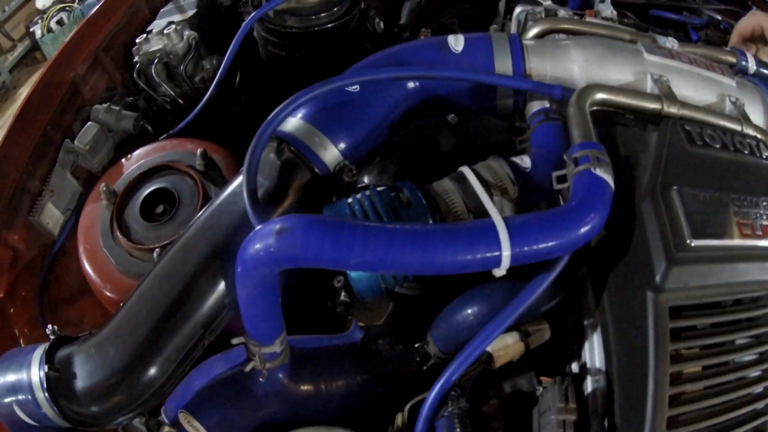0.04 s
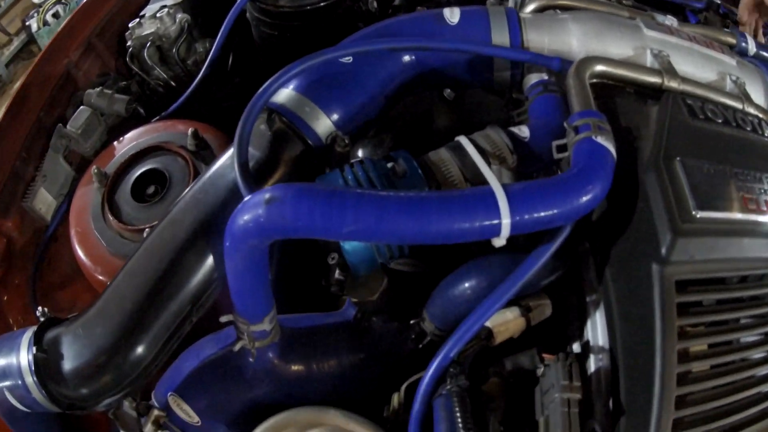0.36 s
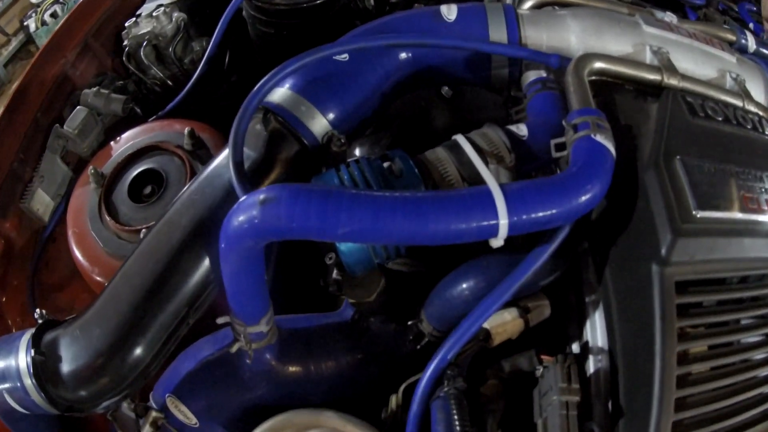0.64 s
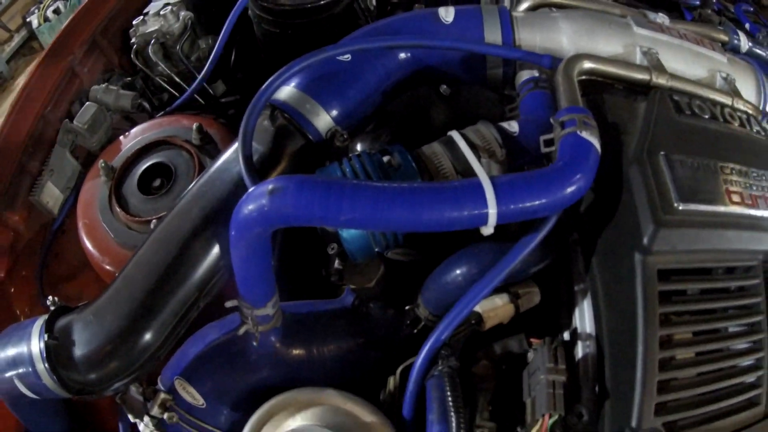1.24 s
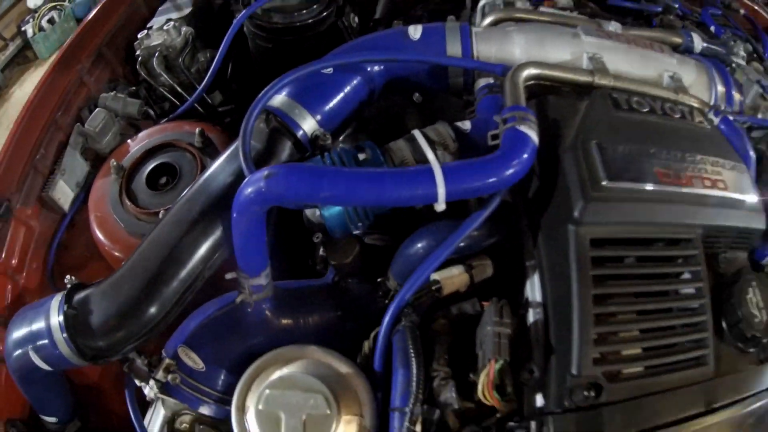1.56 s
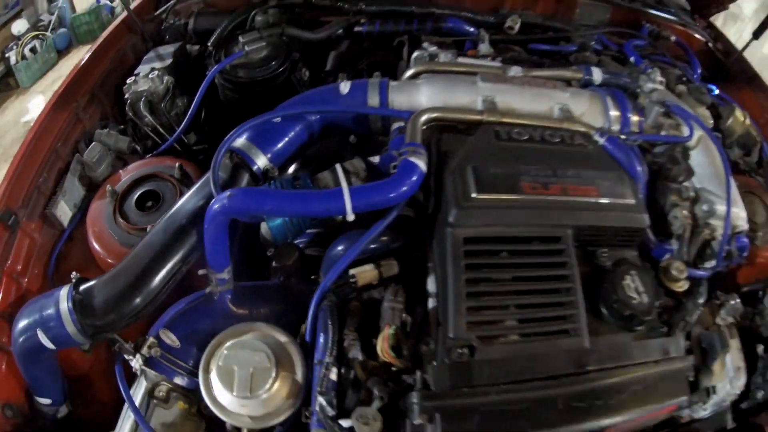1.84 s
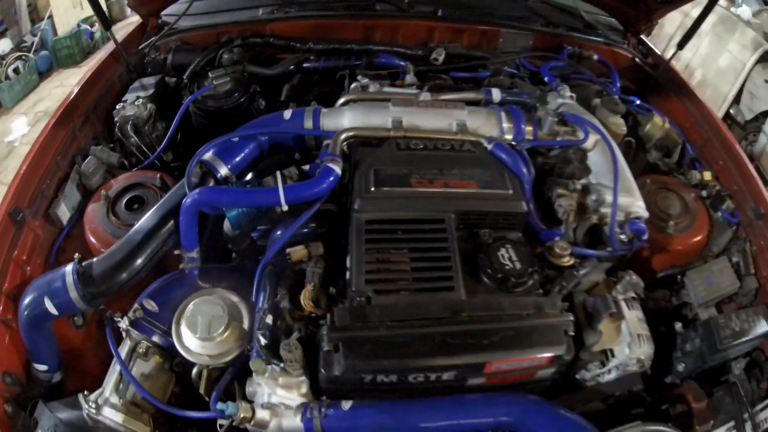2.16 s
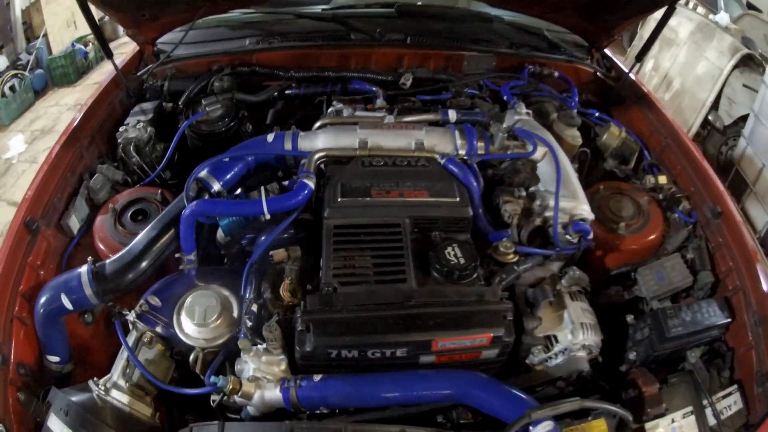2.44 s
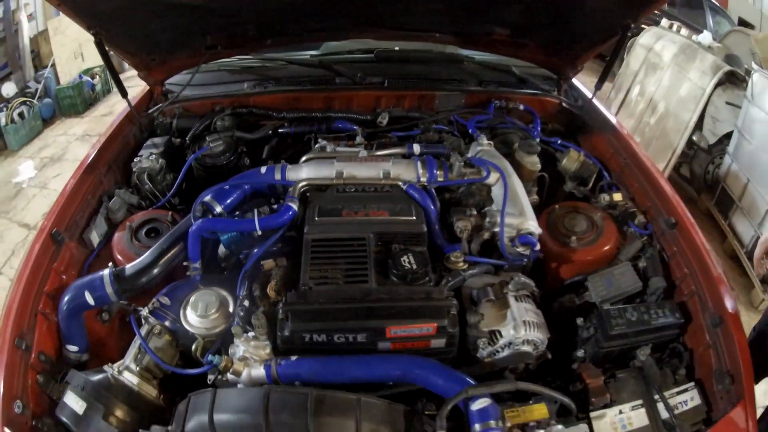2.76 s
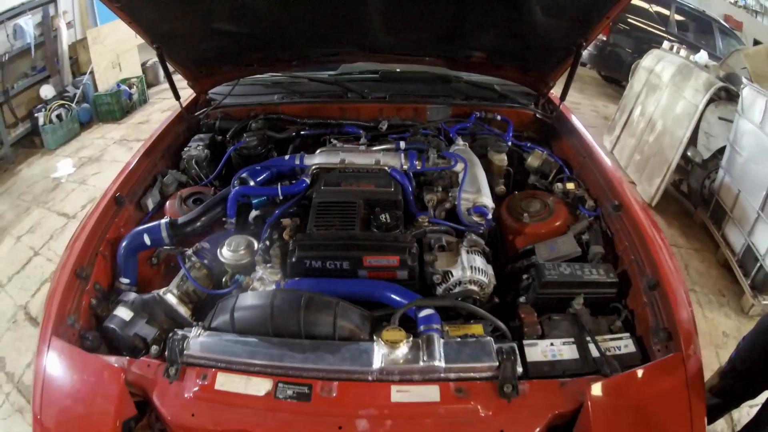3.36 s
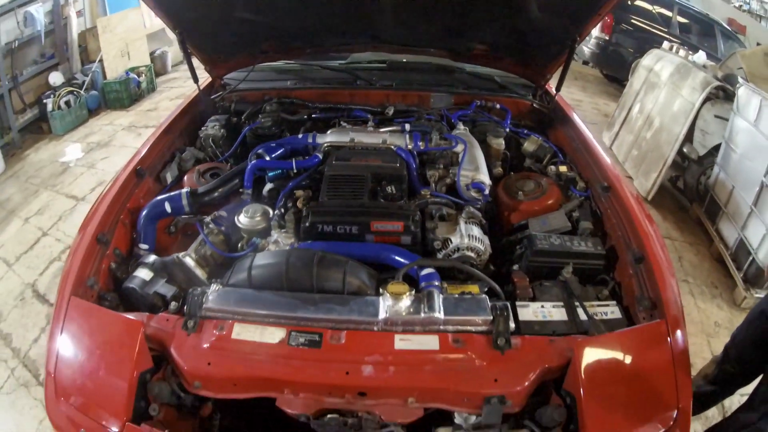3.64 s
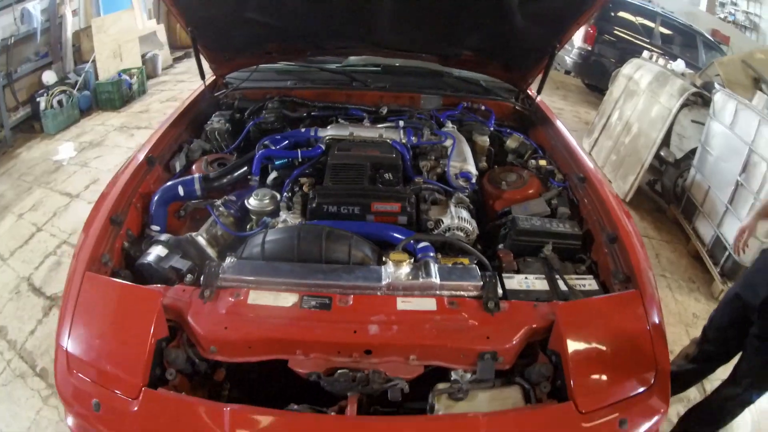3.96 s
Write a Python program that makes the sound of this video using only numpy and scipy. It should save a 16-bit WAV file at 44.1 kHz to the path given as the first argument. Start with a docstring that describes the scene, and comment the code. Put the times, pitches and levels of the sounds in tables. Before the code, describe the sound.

A turbocharged car engine revs once, flutters out hissing air, and sinks to idle.

```python
"""A roar of intake air and a boom of exhaust: a turbocharged straight-six is blipped in a workshop, heard in
mono from over the open engine bay. The throttle shuts, and trapped boost surges back through the compressor in
fading chuffs, about 14 a second. The exhaust booms on as the revs sink, and the engine settles into a rumbling
idle, with belts whirring and injectors ticking."""
import sys
import numpy as np
from scipy import signal
from scipy.fft import rfft, irfft
from scipy.io import wavfile

SR = 44100
rng = np.random.default_rng(int(sys.argv[2]) if len(sys.argv) > 2 else 0)


def waveform_to_disk(signal):
    """Save audio, clipped to [-1, 1], as 16-bit WAV at the path in sys.argv[1]."""
    frames = np.transpose(np.atleast_2d(signal))
    scaled = np.clip(frames, -1, 1) * 32767
    samples = np.round(scaled).astype(np.int16)
    wavfile.write(sys.argv[1], SR, samples)


N = 176400
TIME = np.arange(N) / SR

# The revs. Each row: time in seconds, firings per second.
FIRING_RATE = [(0, 156), (.15, 175.5), (.3, 220), (.4, 249), (.55, 237), (.8, 208), (1, 190), (1.25, 163),
               (1.5, 144.4), (1.75, 123.5), (2, 104.6), (2.25, 87), (2.5, 72), (2.65, 63), (2.8, 53),
               (3, 54), (3.25, 50.3), (3.5, 50.2), (3.75, 49.5), (4, 44.7)]
# Belts, fan and block below the microphone. Each row: time in seconds, level in dB.
BAY_LEVEL = [(0, -28.5), (.4, -39.5), (1.2, -32.5), (1.6, -37.5), (1.73, -45.5), (1.96, -47), (2.3, -40),
             (2.62, -34.5), (2.8, -38.5), (3.05, -31), (3.3, -25.5), (3.55, -27), (4, -26)]
# Narrow rings of the engine. Each row: pitch in Hz, width in Hz, relative level in dB.
BAY_RINGS = [(369.5, 30.5, -11), (1076, 100, -13.5), (1415, 59, -16), (4495, 210, -16.5)]
# Exhaust note at the firing rate. Each row: time in seconds, level in dB.
EXHAUST_BOOM = [(0, -8.5), (.025, -9.5), (.055, -38), (.11, -10.5), (.14, -21.5), (.17, -11), (.21, -22),
                (.26, -16.5), (.36, -38), (.65, -50), (.83, -32.5), (.87, -23), (.905, -47), (.945, -21),
                (.985, -35), (1.02, -24), (1.07, -61), (1.18, -33), (1.225, -10), (1.26, -31), (1.29, -32),
                (1.37, -8), (1.45, -30.5), (1.51, -12), (1.6, -21), (1.66, -12.5), (1.77, -18), (1.81, -30),
                (1.85, -13), (1.93, -17), (2, -40), (2.05, -17.5), (2.22, -19.5), (2.56, -35),
                (2.66, -14.5), (2.73, -23), (2.82, -35), (4, -57)]
# Its overtones. Each row: time in seconds, levels in dB at twice and three times the firing rate.
EXHAUST_OVERTONES = [(0, -43, -49), (.3, -34, -37), (.45, -55, -74), (1.2, -61, -72), (1.36, -31, -55),
                     (1.5, -56, -57), (1.64, -41, -54), (1.71, -52, -34), (1.76, -50, -60),
                     (1.81, -48, -59), (1.86, -49, -34.5), (1.97, -46, -58), (2.25, -36, -54),
                     (2.4, -21, -50), (2.57, -24.5, -44), (2.66, -13.5, -40), (2.87, -28, -30.5),
                     (3, -27.5, -24.5), (3.25, -19, -20), (4, -19.5, -19.5)]
# Uneven firing. Each row: time in seconds, levels in dB of the rumble and of the crankshaft tones
# at 2/3 and 4/3 of the firing rate.
UNEVEN_FIRING = [(0, -25, -36, -32), (.3, -38, -43, -57), (.6, -39, -65, -72), (.95, -42.5, -34.5, -69),
                 (1.25, -30, -30.5, -39), (1.45, -28, -44, -34), (1.8, -37.5, -64, -41),
                 (2.25, -34.5, -42, -24), (2.5, -25.5, -60, -31.5), (2.7, -28, -55, -21),
                 (2.9, -30, -60, -32), (3.3, -21, -62, -35.5), (4, -21, -60, -44)]
# Heavy exhaust pops. Each row: centre in seconds, peak in dB, pitch in Hz.
EXHAUST_POPS = [(.44, -25, 70), (.872, -17.5, 170), (.943, -15.5, 147), (1.018, -17.5, 138),
                (1.16, -17.5, 119), (3.447, -2, 132), (3.82, -9, 135.4)]
# Open-throttle roar. Each row: time in seconds, growl in dB, rasp in dB.
INTAKE_LEVELS = [(0, -25.5, -41), (.03, -38, -38), (.135, -21, -30), (.17, -25, -33), (.22, -21.5, -27),
                 (.3, -20.5, -21.5), (.335, -27, -21), (.39, -44.5, -43), (.6, -64, -61)]
# Compressor surges. Each row: centre in seconds, relative peak in dB.
SURGES = [(0.392, -8.5), (0.468, -11.5), (.545, -11), (.615, -11), (.692, -10.5), (.765, -10.5),
          (.835, -10), (0.906, -10.5), (0.978, -10.5), (1.048, -10), (1.117, -9.5), (1.187, -12),
          (1.257, -13), (1.329, -14), (1.397, -20), (1.47, -20.5), (1.538, -23.5), (1.61, -25),
          (1.676, -31), (1.751, -38), (1.817, -37.5), (1.887, -42.5), (1.957, -41), (2.027, -43.5),
          (2.093, -40.5), (2.163, -42.5), (2.229, -41.5), (2.296, -42.5), (2.364, -42.5), (2.429, -41),
          (2.493, -42), (2.561, -41.5), (2.622, -38.5)]
# Surges shorten as boost drains. Each row: time in seconds, half length in seconds.
SURGE_HALF_LENGTH = [(.39, 0.035), (.55, 0.036), (.77, 0.028), (.91, 0.025), (1.1, 0.022), (1.6, 0.018),
                     (2.6, 0.011)]
# Intake pipe resonances. Each row: pitch in Hz, width in Hz, relative dB at high, low and spent boost.
PIPE_RINGS = [(3390, 200, -15.5, -17, -2.5), (5150, 720, -14, -18, -2), (11370, 380, -27, -8.5, -8.5),
              (12810, 270, -15, -5.5, -15)]
# Thin jet leaking at high boost. Each row: time in seconds, level in dB.
LEAK_LEVEL = [(.33, -62), (.355, -19), (.7, -21), (.82, -23), (.95, -56), (1.2, -70)]
# Tone of each noise at the microphone. Each row: frequency in Hz, relative level in dB.
WHIRR_SPECTRUM = [(150, -10), (250, 3.5), (297, -4.5), (365, -8), (457, -8.5), (542, -6.5), (739, -8.5),
                  (849, -11.5), (1040, -11.5), (1260, -11.5), (1420, -8), (2080, -19), (3860, -20),
                  (4510, -20.5), (4910, -21.5), (12000, -25.5), (15300, -30)]
TICK_SPECTRUM = [(4000, -24), (7000, -6), (12000, 4), (15000, -2.5)]
RUMBLE_SPECTRUM = [(20, -33), (40, -20), (62, -8.5), (100, 4), (150, 3), (200, 1.5), (260, -17.5),
                   (400, -38.5), (900, -80)]
GROWL_SPECTRUM = [(200, 2.5), (300, -3.5), (390, -8.5), (480, 2.5), (570, -3), (680, 1), (900, -7.5),
                  (3000, -57)]
RASP_SPECTRUM = [(700, -18.5), (1300, 3.5), (1620, 1), (2100, -10), (3500, -16.5), (15000, -22)]
HIGH_BOOST_SPECTRUM = [(1060, -33), (1800, -10), (2400, -12.5), (2950, -9), (3190, -1.5), (3400, -4),
                       (3780, -6.5), (4490, -0.5), (5180, 0.5), (6830, -6), (8550, -3.5), (10100, -8.5),
                       (11200, -3), (13000, -8), (15300, -10.5)]
LOW_BOOST_SPECTRUM = [(1180, -48), (2000, -15), (2350, -17), (2980, -10), (3280, -11), (3720, -17),
                      (3920, -7), (5190, -7), (6810, -13), (8500, -5.5), (9340, -9), (11200, -2.5),
                      (12200, -1.5), (12800, -1.5), (15300, -11.5)]
HOLLOW_SPECTRUM = [(900, -16), (1550, 7.5), (2100, -8), (3000, -23), (8000, -50)]
GULP_SPECTRUM = [(120, 7), (650, 0), (1100, -1), (4000, -45)]
LEAK_SPECTRUM = [(5500, -31), (8500, -8), (11200, 3.5), (15000, -2.5)]

CYLINDERS = 6
HIGH_BOOST_S, LOW_BOOST_S, SPENT_S = .52, 1.1, 2.36


def from_db(db):
    """Decibels to gain."""
    return 10 ** (np.asarray(db) / 20)


def rms_one(x):
    """Scale to unit level."""
    return x / np.sqrt(np.mean(x ** 2) + 1e-20)


def in_time(rows):
    """Each column of a curve at every sample."""
    times, *columns = np.transpose(rows)
    return [np.interp(TIME, times, column) for column in columns]


def noise():
    """White noise."""
    return rng.standard_normal(N)


def coloured(x, spectrum):
    """Shape x by a spectrum, rolling off below its first point; unit level."""
    hz, db = np.transpose(spectrum)
    bins = np.maximum(np.fft.rfftfreq(2 * N, 1 / SR), 1)
    gain = from_db(np.interp(np.log(bins), np.log(hz), db)) * np.minimum(bins / hz[0], 1) ** 2
    return rms_one(irfft(rfft(x, 2 * N) * gain)[:N])


def drift(hz):
    """Random wander with spread 1, mostly slower than hz."""
    step, settle = 40, 2000
    pole = np.exp(-2 * np.pi * hz * step / SR)
    kicks = rng.standard_normal(N // step + settle + 2)
    slow = signal.lfilter([1], [1, -2 * pole, pole ** 2], kicks)[settle:]
    return np.interp(np.arange(N) / step, np.arange(len(slow)), rms_one(slow))


def ringing_noise(hz, width):
    """Noise through one resonance; unit level."""
    pole = np.exp(-np.pi * width / SR)
    feedback = [1, -2 * pole * np.cos(2 * np.pi * hz / SR), pole ** 2]
    return rms_one(signal.lfilter([1, 0, -1], feedback, noise()))


def cyclic_noise(firings, tonal, top_hz):
    """Noise of which a part repeats every engine cycle, so that its lines follow the revs."""
    size = 4096
    position = firings / CYLINDERS * size
    loop = np.interp(position, np.arange(size), rng.standard_normal(size), period=size)
    loop = signal.sosfilt(signal.butter(2, top_hz, fs=SR, output="sos"), loop)
    return np.sqrt(tonal * np.gradient(position)) * loop + np.sqrt(1 - tonal) * noise()


def machinery(firings):
    """Block and belts whirr below the microphone, clattering with the valve gear; the injectors tick strong and
    weak by turns."""
    level_db, = in_time(BAY_LEVEL)
    clatter = 1 + .23 * np.cos(2 * np.pi * firings) * drift(22)
    whirr = coloured(clatter * cyclic_noise(firings, tonal=.19, top_hz=2550), WHIRR_SPECTRUM)
    rings = sum(from_db(db) * ringing_noise(hz, width) for hz, width, db in BAY_RINGS)
    strength = np.where(np.floor(firings) % 2, .28, 1) * from_db(1.8 * drift(16))
    decay = np.exp(-3.4 * (firings % 1))
    ticks = rms_one(strength * decay * coloured(noise(), TICK_SPECTRUM))
    return from_db(level_db) * (whirr + rings + from_db(-18) * ticks)


def exhaust(firings):
    """Tones locked to the crankshaft, over the rumble of unequal firing pulses."""
    def tone(multiple, db, waver_db):
        amplitude = np.sqrt(2) * from_db(db + waver_db * drift(8.4))
        return amplitude * np.sin(2 * np.pi * (multiple * firings + rng.random()))
    boom_db, = in_time(EXHAUST_BOOM)
    second_db, third_db = in_time(EXHAUST_OVERTONES)
    rumble_db, below_db, above_db = in_time(UNEVEN_FIRING)
    tones = tone(1, boom_db, waver_db=.7)
    tones += tone(2, second_db, waver_db=1.5) + tone(3, third_db, waver_db=1.5)
    tones += tone(2 / 3, below_db, waver_db=2) + tone(4 / 3, above_db, waver_db=2)
    starts = np.flatnonzero(np.diff(np.floor(firings)))
    pulses = np.zeros(N)
    pulses[starts] = rng.standard_normal(len(starts))
    pulses = rms_one(pulses / np.sqrt(np.gradient(firings)))  # equal power at any revs
    return tones + from_db(rumble_db) * coloured(pulses + 1.05 * noise(), RUMBLE_SPECTRUM)


def pops(half_length_s=.0076):
    """Now and then one firing thumps out of the exhaust pipe."""
    thumps = np.zeros(N)
    for centre, db, hz in EXHAUST_POPS:
        t = TIME - centre
        envelope = np.exp(-np.minimum((t / half_length_s) ** 2, 20))
        thumps += from_db(db) * envelope * np.cos(2 * np.pi * hz * t)
    return thumps


def intake(firings):
    """Air is drawn once a firing, growling and rasping while the throttle is open."""
    growl_db, rasp_db = in_time(INTAKE_LEVELS)
    suction = 1 + .13 * np.cos(2 * np.pi * firings)
    flow = suction * cyclic_noise(firings, tonal=.36, top_hz=3060)
    growl = from_db(growl_db) * coloured(flow, GROWL_SPECTRUM)
    return growl + from_db(rasp_db) * coloured(flow, RASP_SPECTRUM)


def escaping_air(low_cut_hz=2340):
    """Trapped boost hisses out; the intake pipe whistles more clearly as it drains."""
    drained = np.interp(TIME, [HIGH_BOOST_S, LOW_BOOST_S], [0, 1])
    air = np.sqrt(1 - drained) * coloured(noise(), HIGH_BOOST_SPECTRUM)
    air += np.sqrt(drained) * from_db(-2) * coloured(noise(), LOW_BOOST_SPECTRUM)
    for hz, width, *levels_db in PIPE_RINGS:
        ring_db = np.interp(TIME, [HIGH_BOOST_S, LOW_BOOST_S, SPENT_S], levels_db)
        air += from_db(ring_db) * ringing_noise(hz, width)
    return signal.sosfilt(signal.butter(1, low_cut_hz, "high", fs=SR, output="sos"), air)


def turbo_flutter(squareness=2.75, rise_stretch=1.057, gulp_delay_s=.034):
    """Boost surges back through the compressor in hollow puffs, each with a gulp, over a thin leak."""
    power = np.zeros(N)
    for centre, db in SURGES:
        half_s = np.interp(centre, *np.transpose(SURGE_HALF_LENGTH))
        offset = abs(TIME - centre) / (half_s * np.where(TIME < centre, rise_stretch, 1))
        power += from_db(db) ** 2 * np.exp(-2 * np.minimum(offset ** squareness, 20))
    puffs = np.sqrt(power)
    hiss = escaping_air() * from_db(-2.5 + .5 * drift(90))
    hollow = from_db(-25) * coloured(noise(), HOLLOW_SPECTRUM)
    late_puffs = np.interp(TIME - gulp_delay_s, TIME, puffs)
    gulps = from_db(-32.5) * late_puffs * coloured(noise(), GULP_SPECTRUM)
    leak = from_db(in_time(LEAK_LEVEL)[0]) * coloured(noise(), LEAK_SPECTRUM)
    return puffs * (hiss + hollow) + gulps + leak


def scene():
    """Engine and turbo from one spot over the bay, the same in both channels."""
    firings = np.cumsum(in_time(FIRING_RATE)[0]) / SR  # running count
    mono = exhaust(firings) + machinery(firings) + pops() + intake(firings) + turbo_flutter()
    return np.stack([mono, mono])


def record(dry, ceiling=.86, cutoff_hz=15250):
    """The highest peaks are rounded off and the top is cut steeply."""
    rounded = dry / (1 + (dry / ceiling) ** 8) ** (1 / 8)
    return signal.sosfilt(signal.ellip(12, .1, 90, cutoff_hz, fs=SR, output="sos"), rounded)


dry = scene()
out = record(dry)
waveform_to_disk(out)
```